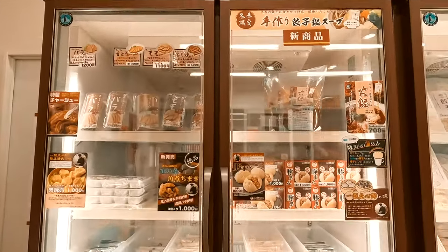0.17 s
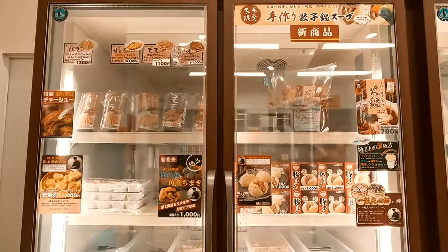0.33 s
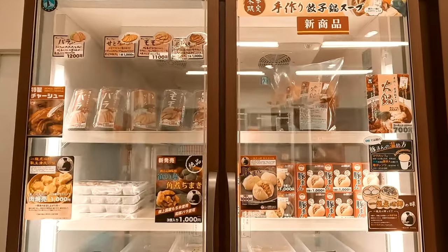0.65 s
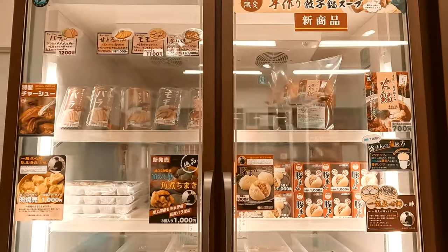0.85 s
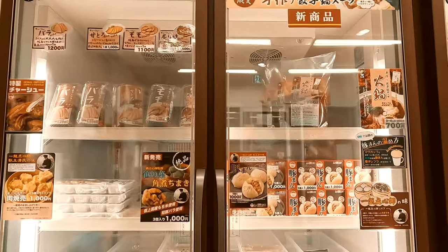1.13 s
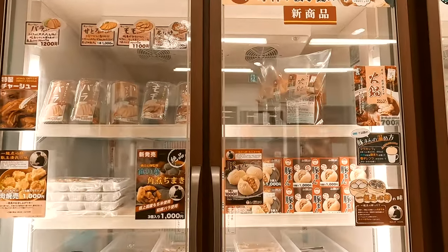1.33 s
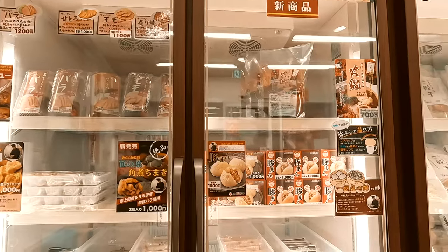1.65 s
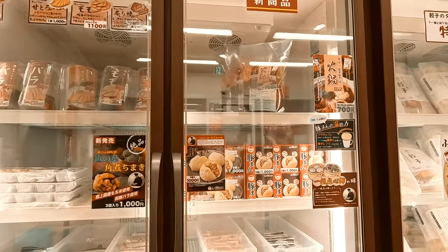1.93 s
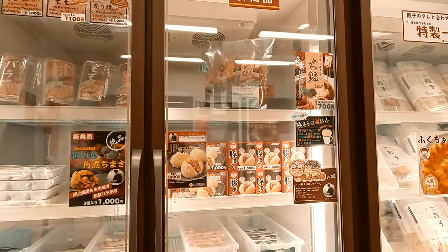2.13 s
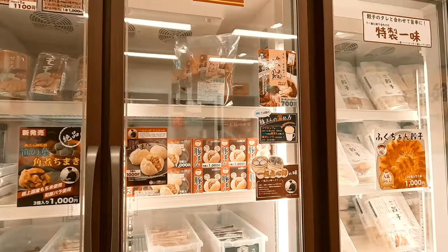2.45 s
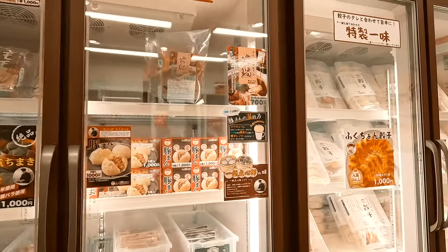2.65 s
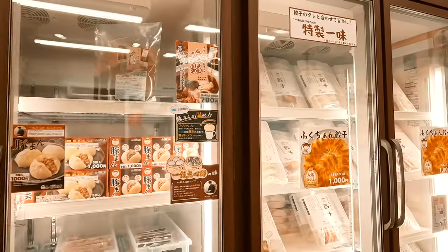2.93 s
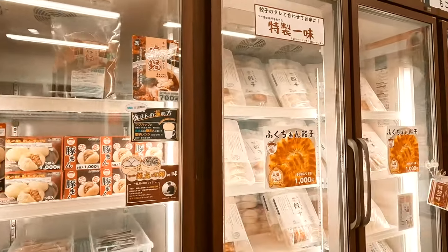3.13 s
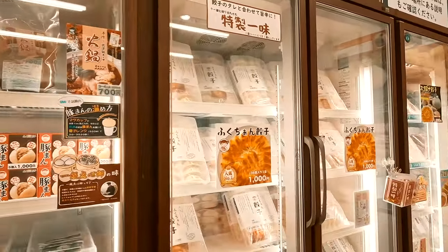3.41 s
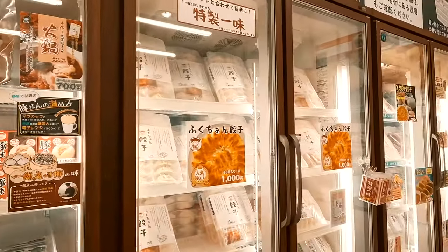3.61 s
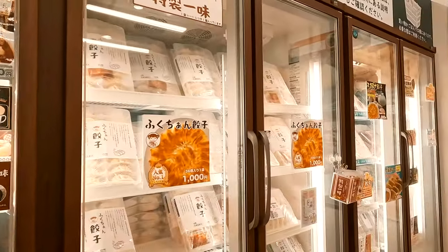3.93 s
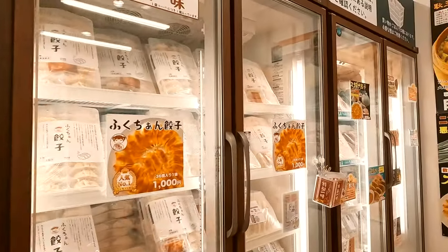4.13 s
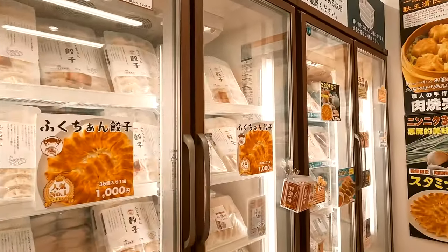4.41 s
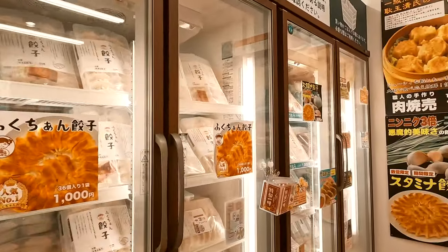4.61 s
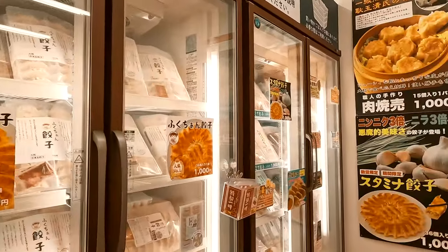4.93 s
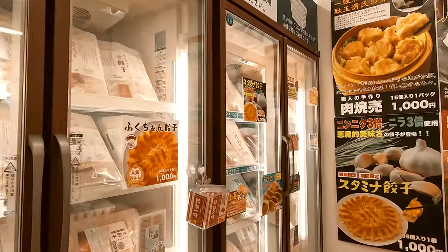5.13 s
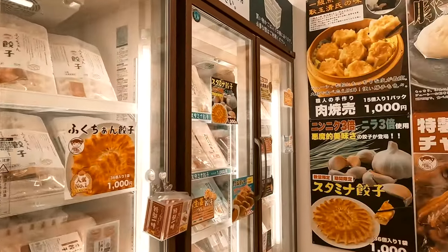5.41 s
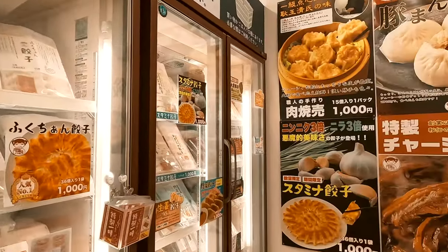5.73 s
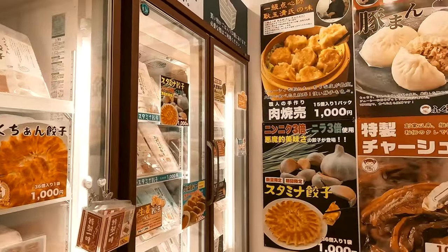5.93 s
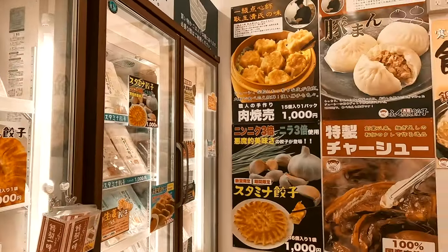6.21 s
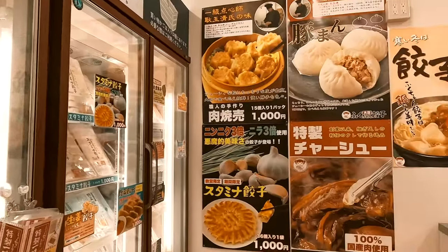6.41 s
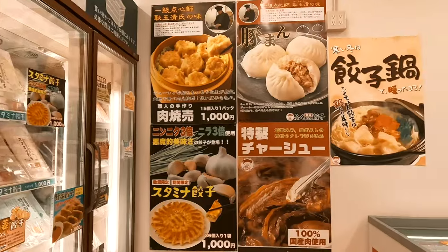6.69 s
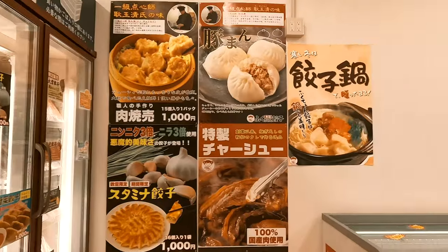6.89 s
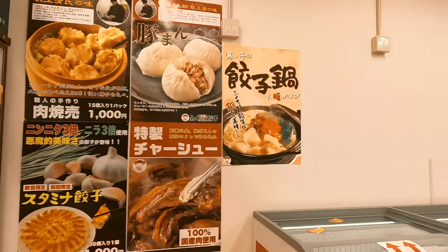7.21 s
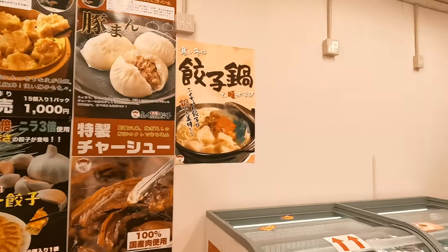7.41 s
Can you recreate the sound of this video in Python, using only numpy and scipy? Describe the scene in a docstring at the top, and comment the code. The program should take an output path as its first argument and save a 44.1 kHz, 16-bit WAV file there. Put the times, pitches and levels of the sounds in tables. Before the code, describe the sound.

A row of freezer cabinets hums in a small shop. Several compressors beat together, making the low hum swell and sink about twice a second. Fans push a steady soft rush of air, with faint narrow whines above. The microphone moves slowly past, so tones shift gently. One short, dull click comes near the end.

```python
"""Three compressors of a row of freezer cabinets throb in a small shop: nearly equal tones that beat together.
Fans drone over the shaped noise of the air they move; motor drives whine in narrow tones with weak sidebands.
Three tones sing out in places, and a few faint ticks are short bursts of filtered noise.
The microphone is carried slowly past, so levels follow its distance and the room's standing waves.
"""
import sys
import numpy as np
from scipy import signal
from scipy.fft import rfft, irfft, next_fast_len
from scipy.io import wavfile
from scipy.ndimage import uniform_filter1d, map_coordinates

SR = 44100
rng = np.random.default_rng(int(sys.argv[2]) if len(sys.argv) > 2 else 0)


def master(y):
    """Save y as 16-bit WAV."""
    cut = np.clip(np.atleast_2d(y).T, -1, 1)
    pcm = np.round(cut * 32767)  # scale
    wavfile.write(sys.argv[1], SR, pcm.astype(np.int16))


N = 332955  # length in samples

# Faint ticks. Each row: start in seconds, level in dB, centre in Hz, width in octaves, 60 dB decay in seconds.
TICKS = [(.648, -62, 7500, .45, 0.2), (3.778, -61, 7400, .15, .14), (6.265, -32, 1700, 0.28, .06)]

# Steady tones of fan shafts, mains hum and ringing panels. Each row: frequency in Hz, level in dB.
DRONES = [(25.2, -57), (36.2, -42), (72.5, -47.5), (120, -46), (157, -49), (519, -55), (568.5, -53),
          (605.5, -67), (805.5, -52)]
# Moving air near the outlets; only departures from the mean act. Each row: time in seconds, level in dB.
OUTLET_LEVEL = [(0.1, -38), (0.14, -39), (1.54, -39), (2.25, -40.5), (3.6, -38.5), (4.1, -39.5),
                (4.19, -41.5), (5.24, -39.5), (5.81, -40.5), (6.02, -39.5), (7.22, -40.5), (7.4, -40.5)]
# Low rumble of the air. Each row: time in seconds, level in dB.
RUMBLE_LEVEL = [(0, -33.5), (1.2, -32.5), (2.45, -36), (3.8, -32.5), (4.35, -36), (4.9, -34.5), (6.5, -35),
                (7.15, -33.3), (7.55, -34.5)]
# Relative spectra of the three air noises. Each row: frequency in Hz, density in dB per Hz.
RUMBLE_SPECTRUM = [(10, -21.5), (22, 3.5), (60, -3), (120, 2), (150, -1), (205, -3.5), (230, 0),
                   (255, -2.5), (300, 0), (380, -3), (440, -2), (530, -5), (640, -9.5), (800, -12),
                   (1500, -58), (3000, -120)]
RUSH_SPECTRUM = [(100, -120), (400, -33), (700, -4.5), (800, -8.5), (920, 0), (1200, -4.5), (1450, -8.5),
                 (2100, -13.5), (2800, -19.5), (4000, -29.5), (8000, -76), (12000, -120)]
HISS_SPECTRUM = [(1500, -25), (2800, -6), (3200, 0), (3700, -5), (5000, -10.5), (6000, -12.5), (6450, -7),
                 (7000, -15), (7600, -18), (8400, -25.5), (9550, -23.5), (10600, -31), (12400, -37),
                 (14500, -50)]
RUSH_DB, RUSH_FOLLOWS = -38.5, 1.1  # level at mean nearness in dB, dB per dB of nearness
HISS_DB, HISS_FOLLOWS = -51.5, .9

# Two fans' blade tones and a drive tone that sing out in places. Each entry: frequency in Hz.
SINGING_HZ = [831.8, 846.8, 7316]
# Places where they escape the cabinets. Each row: index of the tone, time of nearest approach in seconds,
# half length in seconds, level at nearest approach in dB.
PASSES = [(0, 3.35, .22, -45.5), (0, 5.1, 0.37, -45.5), (1, 4.8, 0.23, -47), (1, 7.13, 0.65, -39.5),
          (2, 6.1, 0.88, -70)]

# Switching tones of the motor drives, mostly near multiples of the switching rate.
# Each row: frequency in Hz, level in dB before the common gain of the whine.
WHINES = [(1705, -62.5), (1726, -63.5), (3064, -67), (3102, -64), (3136, -76.5), (3151, -74), (3172, -55.5),
          (3228, -59.5), (3246, -78), (3260, -68.5), (3304, -64.5), (3354, -61.5), (3402, -73.5),
          (6272, -76.5), (6304, -68), (6380, -72), (6405, -73.5), (6430, -66), (6454, -73), (6506, -70),
          (6561, -68), (7012, -76.5), (9310, -92), (9507, -85.5), (9582, -86.5), (9607, -84), (9709, -87)]
SWITCHING_HZ = 3202
WHINE_DB, WHINE_FOLLOWS = -0.05, 1.4  # mean gain in dB, dB per dB of nearness
WANDER_CYCLES = 0.28  # unsteadiness of phase
# Where the drives are loudest: time in s, half length in s, lift in dB at the switching rate.
DRIVES_NEAREST_S, DRIVES_HALF_S, DRIVES_LIFT_DB = 3.4, .55, 1.5

COMPRESSOR_HZ = 86.55  # the steady machine
# Fundamentals along the row. Each row: time in seconds, slow machine in dB, steady machine in dB.
HUM = [(0, -26.5, -28), (2.5, -29, -25.5), (3.8, -24, -24.5), (5, -28, -24), (7.55, -29, -25)]
FAST_HUM_DB = -27
# Overtones. Each row: multiple, mean level of the slow, the steady and the fast machine, each in dB.
OVERTONES = [(2, -46, -40.5, -51), (3, -56, -43.5, -48), (4, -58, -57.5, -63), (5, -55.5, -52.5, -51.5)]
# How far the slow machine runs under the steady one. Each row: time in seconds, difference in Hz.
SLOW_LAG = [(0, 2.06), (1.7, 2.49), (3, 2.2), (5, 2.64), (7.55, 2.57)]
# How far the fast machine runs over it. Each row: time in seconds, difference in Hz.
FAST_LEAD = [(0, .59), (2, .27), (4, .55), (6, 1.27)]
SLOW_TROUGH_S, FAST_TROUGH_S = .43, .67  # first antiphase with the steady machine
# Standing waves that lift or sink an overtone.
# Each row: multiple, time in seconds, half length in seconds, change in dB before its mean is removed.
STANDING = [(2, .6, .5, 3), (2, 2.5, .5, -2), (2, 3.86, .33, 6), (2, 5.5, 0.083, -6), (2, 5.5, .16, 4),
            (2, 7.1, .35, 3), (3, 3.85, 1.3, -7)]

# Likeness of the two channels. Each row: frequency in Hz, left-right correlation.
ALIKE = [(60, 1), (130, 1), (290, .98), (620, .85), (1360, .84), (2960, .73), (5000, .87), (8000, .74),
         (14000, .8)]
# Balance of the scene. Each row: frequency in Hz, left minus right in dB.
LEFTWARD = [(100, 0), (200, 0), (370, .9), (680, 0), (1250, 1.9), (2300, 1.6), (4000, 1), (12000, 1.4)]
TOP_HZ = 14700  # band limit


def amp(db):
    """Level law: twenty decibels are a factor of ten in amplitude."""
    return 10 ** (np.asarray(db) / 20)


def unit(x):
    """Normalisation: x scaled to rms 1."""
    return x / np.sqrt(np.mean(x ** 2) + 1e-20)


def clock():
    """Sampling: the time of every sample in seconds."""
    return np.arange(N) / SR


def along(points, hz):
    """Logarithmic frequency scale: (Hz, value) points interpolated at hz."""
    point_hz, values = np.transpose(points)
    return np.interp(np.log(hz + 1), np.log(point_hz + 1), values)


def curves(rows):
    """Linear interpolation in time: one curve for each column after the time."""
    s, *columns = np.transpose(rows)
    return [np.interp(clock(), s, column) for column in columns]


def bump(s, half_s):
    """Gaussian envelope: a smooth rise to 1 at s, down to 1/e at half_s either side."""
    return np.exp(-((clock() - s) / half_s) ** 2)


def wobble(rate):
    """Band-limited random motion: a smooth curve through rate random knots a second."""
    coarse = np.linspace(0, N / SR, 800)
    knots = rng.standard_normal(400)
    smooth = map_coordinates(knots, [coarse * rate], mode="wrap")
    return np.interp(clock(), coarse, smooth)


def filtered(x, response):
    """Linear filtering: the spectrum of x multiplied by a response of frequency."""
    m = next_fast_len(N + SR // 4)
    spectrum = rfft(x, m) * response(np.fft.rfftfreq(m, 1 / SR))
    return irfft(spectrum, m)[..., :N]


def spread(hz):
    """Interchannel correlation: the shares of mid and side sound that give it at hz."""
    turn = np.arccos(np.clip(along(ALIKE, hz), -1, 1)) / 2
    return np.array([np.cos(turn), np.sin(turn)])


def left_right(mid, side):
    """Sum and difference: mid and side sound turned into left and right."""
    return np.array([mid + side, mid - side])


def tone(cycles, hz, diffuse, rate):
    """Interference: a direct stereo tone plus reflections that shift as the microphone moves; rms about 1."""
    angle = 2 * np.pi * (cycles + rng.random())
    sine, cosine = np.sin(angle), np.cos(angle)

    def echo():
        """Reflection: the tone with a wandering amplitude and phase."""
        return sine * wobble(rate) + cosine * wobble(rate)

    centre, width = spread(hz)
    mid = centre * unit(sine + diffuse * echo())
    side = width * unit(echo())
    return left_right(mid, side)


def air(spectrum, patchy_db):
    """Turbulence: stereo noise of rms 1 with eddies as patches of random gain in time and frequency."""
    z = signal.stft(rng.standard_normal((2, N)), nperseg=512)[2]
    field = rng.standard_normal(z.shape[1:])
    field = uniform_filter1d(field, size=5, axis=0)  # across frequency bins
    field = uniform_filter1d(field, size=16, axis=1)  # across time frames
    pair = signal.istft(z * amp(patchy_db * unit(field)), nperseg=512)[1][:, :N]
    mid, side = filtered(pair, lambda hz: amp(along(spectrum, hz)) * spread(hz))
    return unit(left_right(mid, side))


def nearness_db():
    """Proximity: how far the level near the outlets departs from its mean at each moment."""
    db, = curves(OUTLET_LEVEL)
    return db - db.mean()


def ticks():
    """Exponential decay: light contacts as soft-edged noise bursts in one band that die quickly in the room."""
    out = np.zeros((2, N))
    for s, db, centre_hz, octaves, t60 in TICKS:
        def band(hz):
            """Resonance: a Gaussian band on an octave scale."""
            distance = np.log2((hz + 1) / centre_hz) / octaves
            return np.exp(-.5 * distance ** 2) * spread(hz)

        mid, side = filtered(rng.standard_normal((2, N)), band)
        age = np.maximum(clock() - s, 0)
        onset = 1 - np.exp(-age / 0.0039)
        decay = amp(db - 60 * age / t60)
        out += onset * decay * unit(left_right(mid, side))
    return out


def moving_air():
    """Broadband flow noise: rumble, rush and hiss, the last two rising near the outlets."""
    near_db = nearness_db()
    low_db, = curves(RUMBLE_LEVEL)
    rumble = amp(low_db) * air(RUMBLE_SPECTRUM, patchy_db=0.55)
    rush = amp(RUSH_DB + RUSH_FOLLOWS * near_db) * air(RUSH_SPECTRUM, patchy_db=0.56)
    hiss = amp(HISS_DB + HISS_FOLLOWS * near_db) * air(HISS_SPECTRUM, patchy_db=1.1)
    return rumble + rush + hiss


def drones():
    """Periodic excitation: fan shafts, mains hum and panels sound steady tones, altered by reflections."""
    return sum(amp(db) * tone(hz * clock(), hz, diffuse=0.19, rate=3.04) for hz, db in DRONES)


def singing():
    """Inverse square law: each tone's power falls with distance from where it escapes the cabinets."""
    out = 0
    for index, hz in enumerate(SINGING_HZ):
        power = 0
        for which, s, half_s, db in PASSES:
            if round(which) == index:
                # 1 keeps the power finite at the nearest point
                power = power + amp(db) ** 2 / (1 + ((clock() - s) / half_s) ** 2)
        out = out + np.sqrt(power) * tone(hz * clock(), hz, diffuse=0.11, rate=5.8)
    return out


def whine_gain(hz):
    """Directivity: whine swells near the outlets and by the drives, where higher tones gain more as they beam."""
    drives_db = DRIVES_LIFT_DB * hz / SWITCHING_HZ * bump(DRIVES_NEAREST_S, DRIVES_HALF_S)
    db = WHINE_FOLLOWS * nearness_db() + drives_db
    return amp(WHINE_DB + db - db.mean())


def switching_tones():
    """Standing waves: each line of the drives' whine flutters as the microphone moves among them."""
    lines = 0
    for hz, db in WHINES:
        cycles = hz * clock() + WANDER_CYCLES * wobble(3)
        lines = lines + amp(db) * whine_gain(hz) * tone(cycles, hz, diffuse=.35, rate=5)
    return lines


def sidebands():
    """Modulation: many weak steady tones gather round switching multiples and weaken with each multiple."""
    out = 0
    for multiple in (1, 2, 3):
        cluster = 0
        for offset, strength in rng.standard_normal(size=(20, 2)):
            hz = multiple * SWITCHING_HZ + 300 * offset
            channel_phase = rng.normal(0, .5, (2, 1))  # radians
            angle = 2 * np.pi * (hz * clock() + rng.random()) + channel_phase
            db = -66 - 8.8 * multiple + 1.3 * strength
            cluster = cluster + amp(db) * np.sqrt(2) * np.sin(angle)
        out = out + whine_gain(multiple * SWITCHING_HZ) * cluster
    return out


def slip(difference, trough_s):
    """Phase as integrated frequency: cycles of drift from the steady machine, half a cycle at trough_s."""
    cycles = np.cumsum(curves(difference)[0]) / SR
    return cycles - np.interp(trough_s, clock(), cycles) + .5


def standing_db(multiple):
    """Room modes: the lifts and dips that standing waves give one overtone along the way."""
    return sum(db * bump(s, half_s) for k, s, half_s, db in STANDING if round(k) == multiple)


def compressors():
    """Beating: three machines turn at slightly different rates, so their summed hum swells and sinks."""
    steady = COMPRESSOR_HZ * clock() + rng.random()
    slow = steady - slip(SLOW_LAG, SLOW_TROUGH_S)
    fast = steady + slip(FAST_LEAD, FAST_TROUGH_S)
    machines = [slow, steady, fast]
    hum = 0
    for db, turns in zip([*curves(HUM), FAST_HUM_DB], machines):
        hum = hum + amp(db) * np.sqrt(2) * np.sin(2 * np.pi * turns)
    for multiple, *levels in OVERTONES:
        k = round(multiple)
        lift_db = standing_db(k)
        lift_db = lift_db - np.mean(lift_db)
        for db, turns in zip(levels, machines):
            overtone = tone(k * turns, k * COMPRESSOR_HZ, diffuse=0.15, rate=1.17)
            hum = hum + amp(db + lift_db) * overtone
    return hum


def scene():
    """Superposition: all sources add, then a level difference sets the cabinets a little to the left."""
    shop = ticks() + moving_air() + drones() + singing() + switching_tones() + sidebands() + compressors()
    return filtered(shop, lambda hz: amp(np.outer([.5, -.5], along(LEFTWARD, hz))))


def record(dry):
    """Band limitation: nothing passes at or above the top frequency."""
    return filtered(dry, lambda hz: hz < TOP_HZ)


dry = scene()
out = record(dry)
master(out)
```